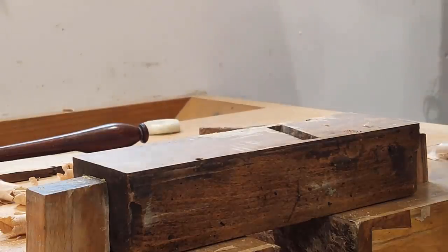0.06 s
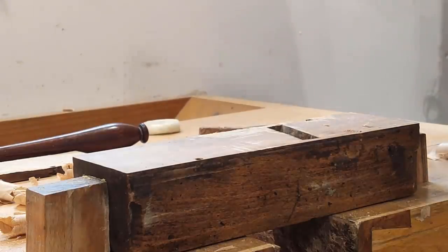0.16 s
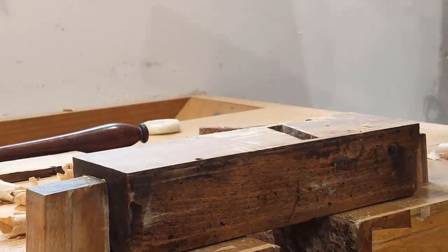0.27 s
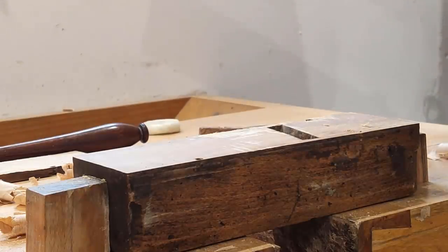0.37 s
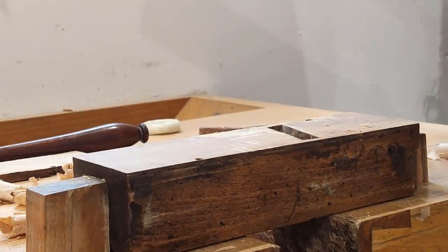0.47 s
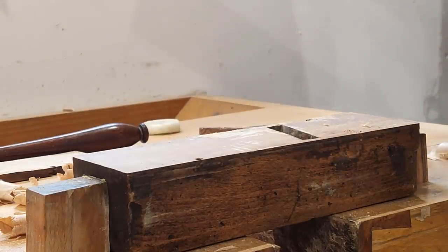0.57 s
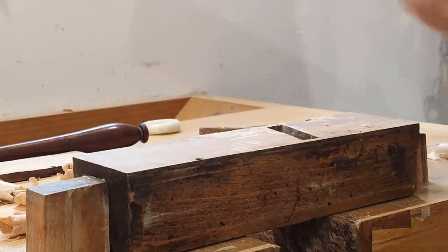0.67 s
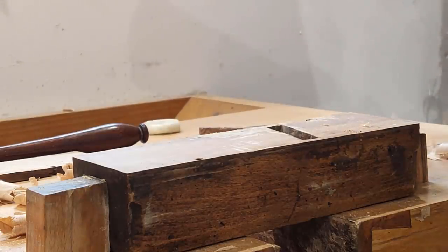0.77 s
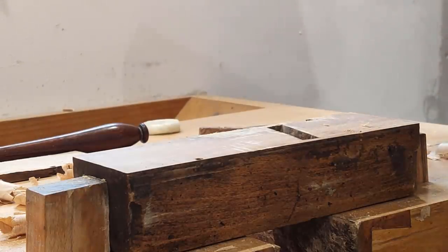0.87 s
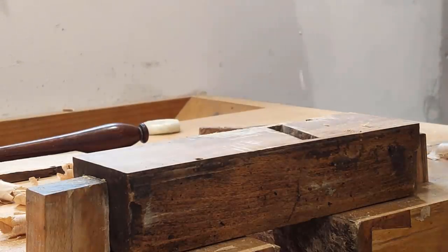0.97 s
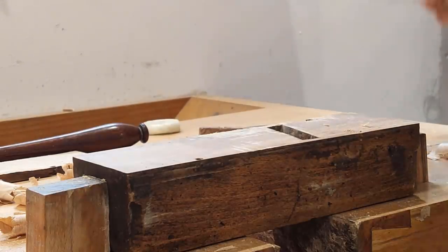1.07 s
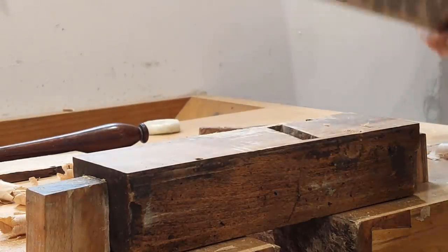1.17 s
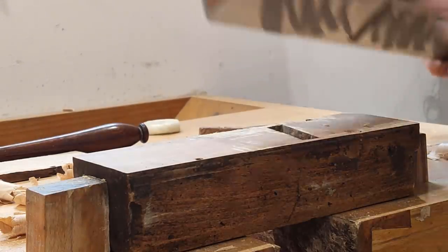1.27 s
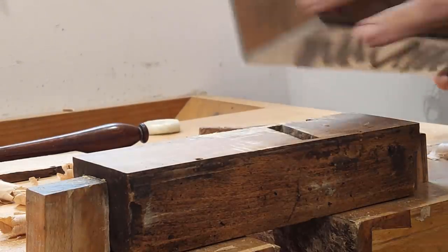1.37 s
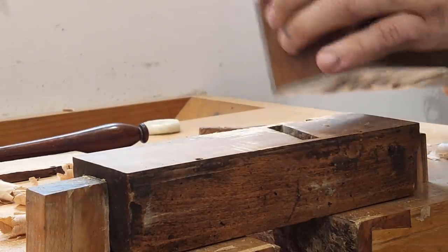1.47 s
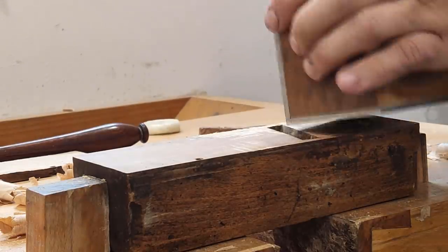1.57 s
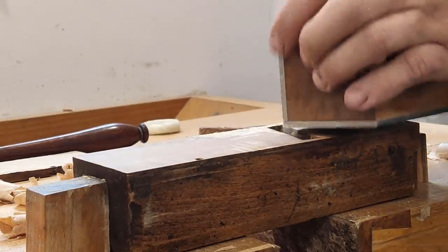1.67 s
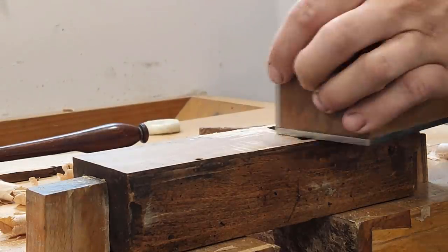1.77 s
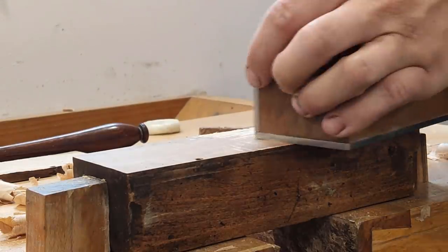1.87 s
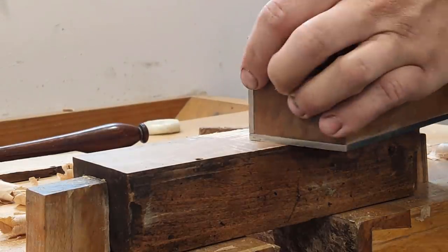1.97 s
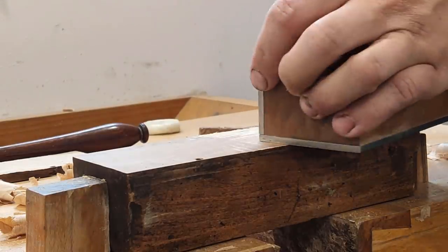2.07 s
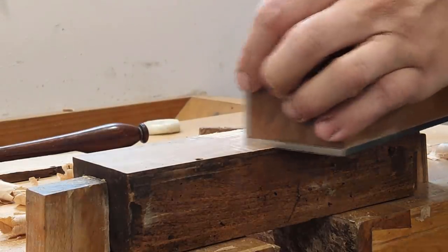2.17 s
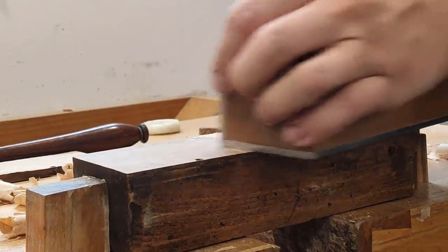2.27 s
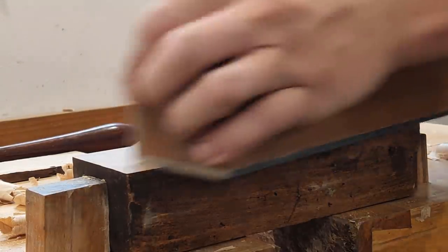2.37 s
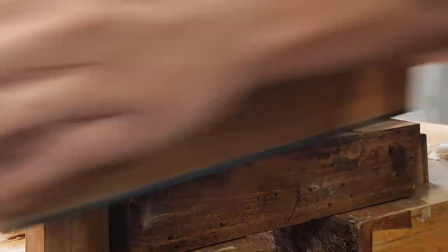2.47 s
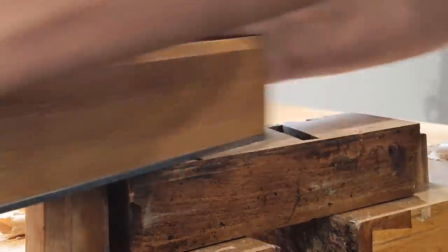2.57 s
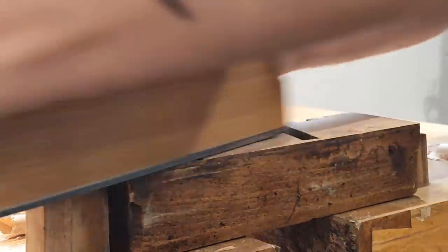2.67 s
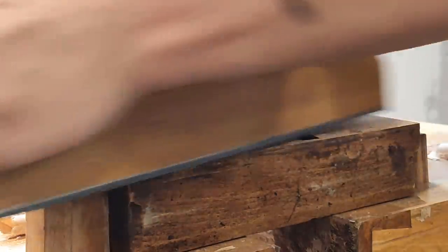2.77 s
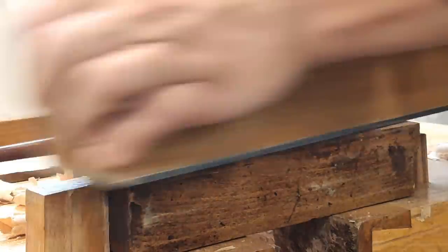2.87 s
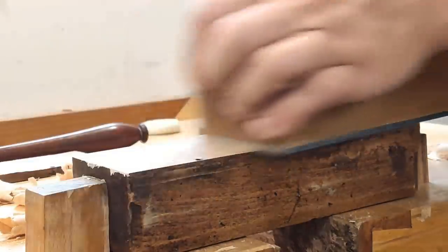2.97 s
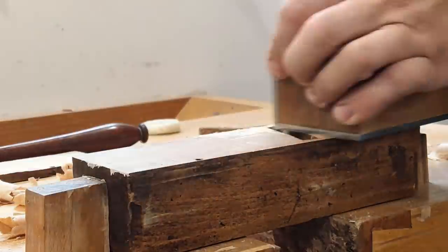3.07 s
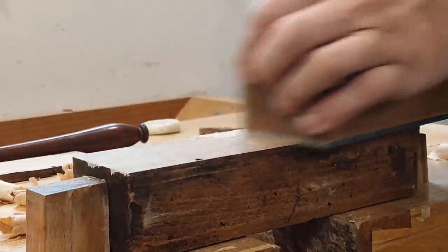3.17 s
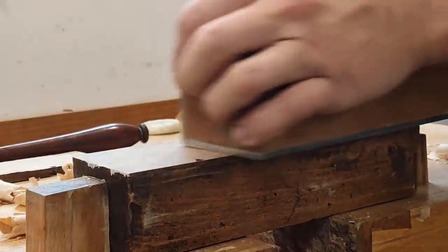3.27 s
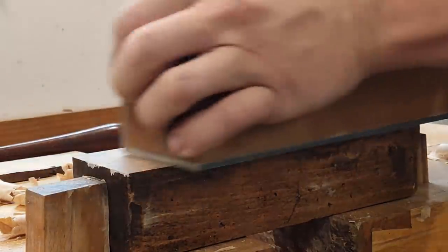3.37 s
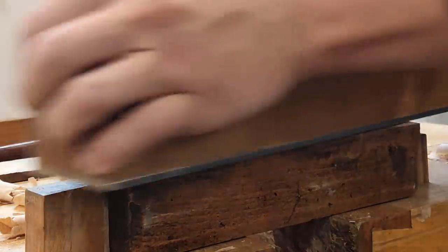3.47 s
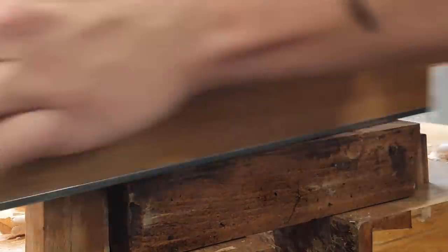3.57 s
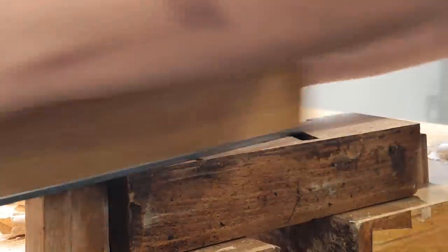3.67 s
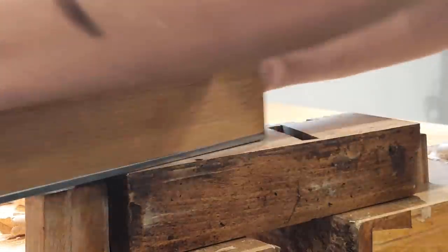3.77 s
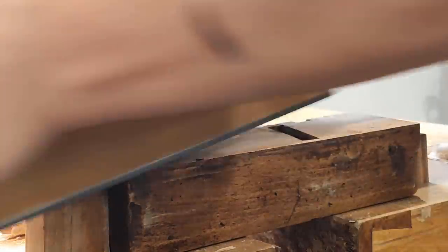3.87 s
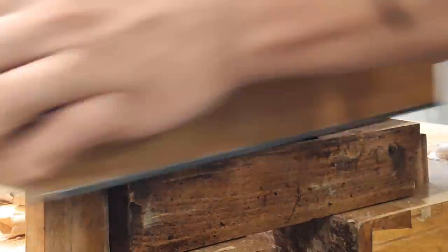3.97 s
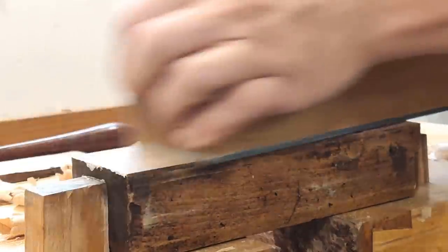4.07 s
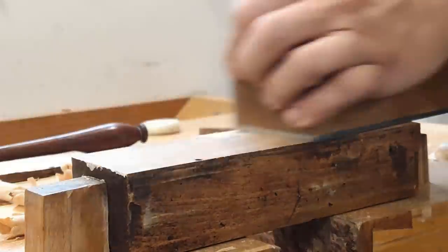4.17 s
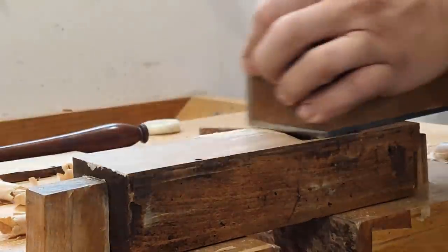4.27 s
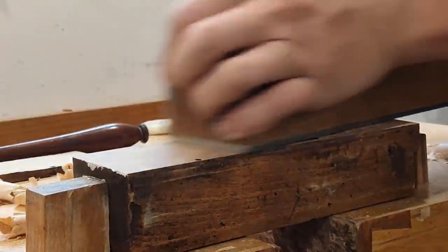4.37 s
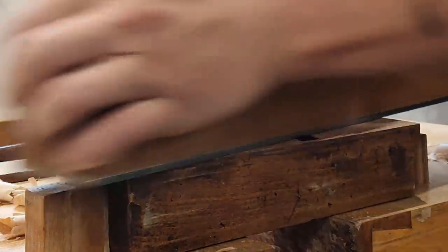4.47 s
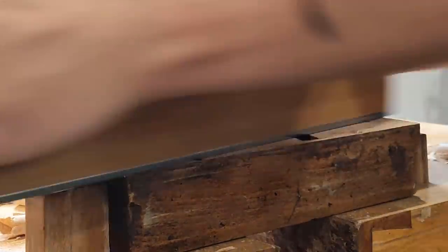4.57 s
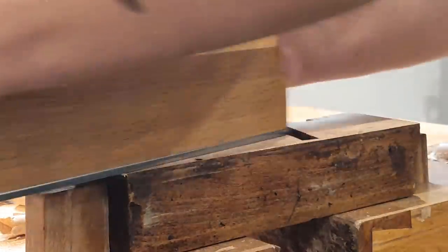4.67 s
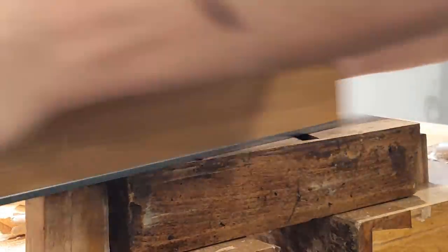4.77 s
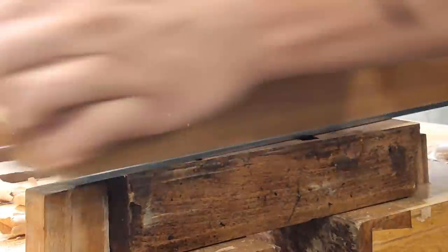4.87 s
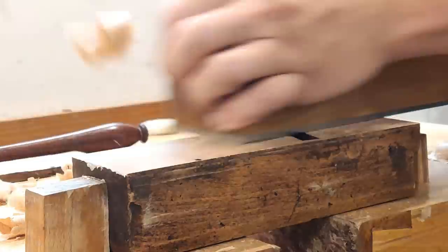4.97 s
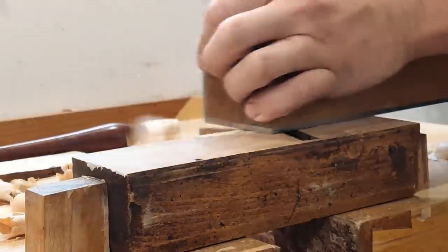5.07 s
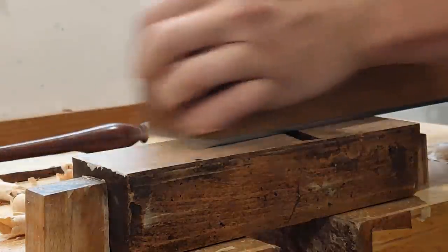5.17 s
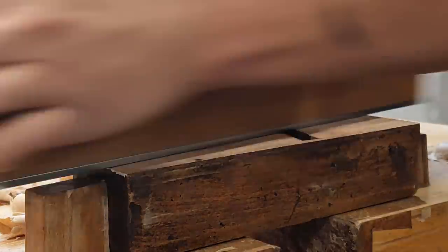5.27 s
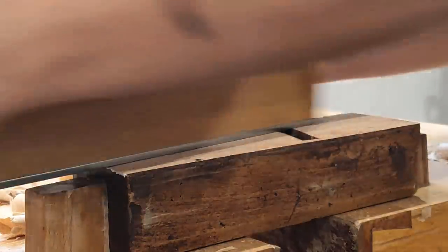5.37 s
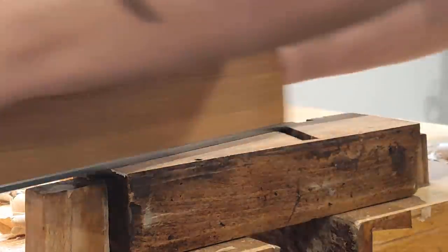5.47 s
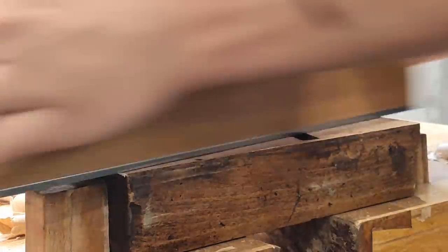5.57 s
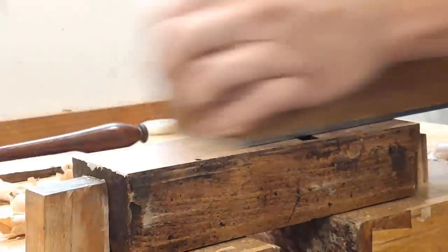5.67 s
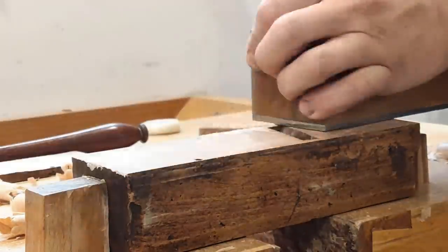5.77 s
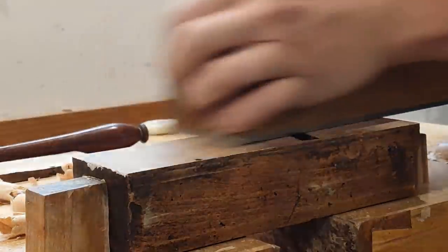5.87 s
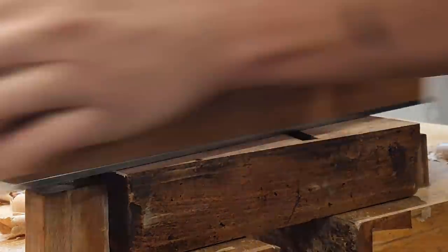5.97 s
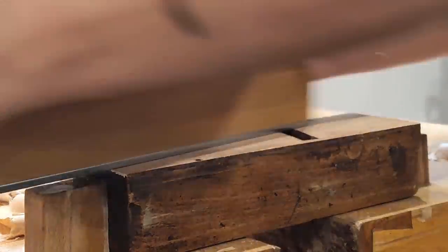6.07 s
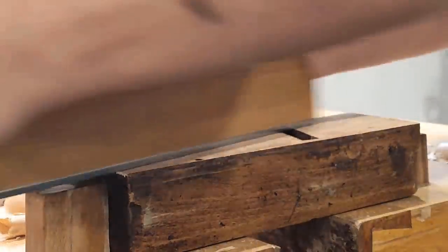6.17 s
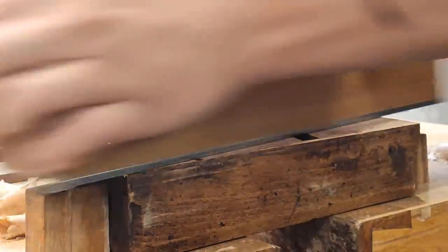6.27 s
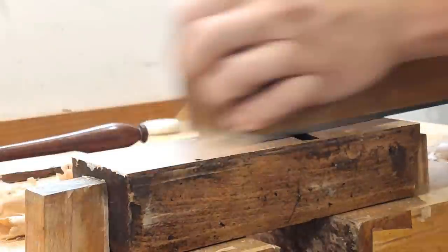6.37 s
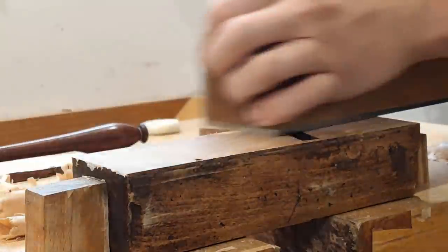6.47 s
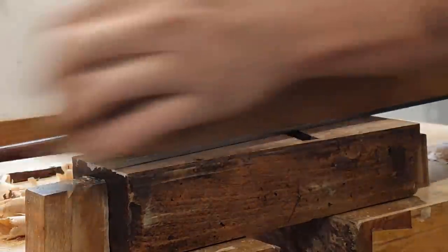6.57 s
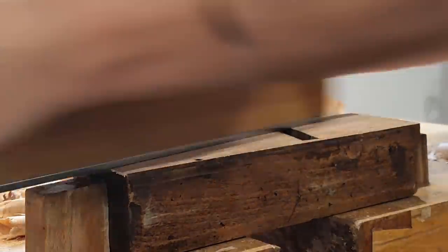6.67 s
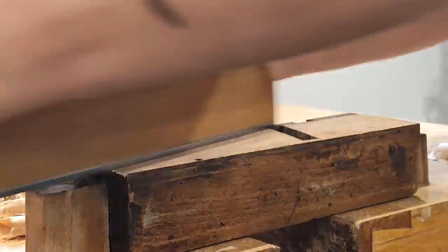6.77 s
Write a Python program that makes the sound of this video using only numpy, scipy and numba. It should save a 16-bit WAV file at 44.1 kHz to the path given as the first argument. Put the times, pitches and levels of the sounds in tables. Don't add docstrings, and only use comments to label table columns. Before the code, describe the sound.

A small hard-walled workshop, heard close in stereo, with soft air, faint hum and low bench sway. From 0 to 1.6 seconds only light sleeve and shaving rustles are heard, swelling near 0.6. At about 1.7 and 1.8 a hardwood board clacks onto a wooden block, then pauses. From 2.3 the first push tears over the steel edge, a bright fibrous hiss with a woody note and metallic ring, ending around 2.55. A knock at 2.9 and light drags lead to a longer push from 3.3 to 3.7. A rattling cluster of loud knocks comes at 4.0-4.25, with a squeak and a grab. Further pushes peak near 4.55, 5.35, 6.05 and 6.7, getting quicker, with duller scrapes back between. Dry chatters buzz at 5.0, loudest at 5.75 and doubled at 6.4; a thin squeal sounds near 5.4. The last push is cut off close to its end.

```python
import sys
import numpy as np
from scipy import signal
from scipy.fft import rfft, irfft, next_fast_len
from scipy.io import wavfile
from scipy.ndimage import uniform_filter1d
from numba import njit

SR = 44100
rng = np.random.default_rng(int(sys.argv[2]) if len(sys.argv) > 2 else 0)


def field_ratio(decibels):
    return 10 ** (np.asarray(decibels, dtype=float) / 20)


def bounce(signal):
    frames = np.transpose(np.atleast_2d(signal))
    limited = np.clip(frames, -1, 1)
    pcm = np.round(limited * 32767).astype(np.int16)
    wavfile.write(sys.argv[1], SR, pcm)


N = 300762
FAST = next_fast_len(N)
FREQS = np.fft.rfftfreq(FAST, 1 / SR) + 1e-3
TIME = np.arange(N) / SR

# t/s, blow level/dB, crack level/dB, bench bass/dB
KNOCKS = [(1.68, -16.5, -42, 13), (1.688, -12, -47, -1), (1.703, -12.5, -45, -0.5), (1.827, -5.5, -36, -4),
          (2.271, -39, -39.5, 13), (2.295, -22, -41, 4.5), (2.898, -15.5, -23.5, 10.5),
          (2.913, -4.5, -20.5, 6.5), (3.099, -17, -27.5, -1), (3.294, -49, -21.5, -11),
          (4.029, -12.5, -25, 7), (4.051, -5, -37, 1), (4.076, 1.5, -13, -4), (4.096, -2, -47, -22),
          (4.109, 0, -32, -11), (4.123, -3, -20.5, -5), (4.249, -12, -48, -27), (4.436, -14, -20.5, -4),
          (4.932, -25, -36, -3.5), (5.234, -31, -31.5, -7), (5.593, -35, -67, 20), (5.636, -31.5, -69, 7),
          (5.664, -38, -35, 13), (5.81, -10, -66, 2.5), (5.97, -37, -48, 6), (6.047, -21, -30.5, 2),
          (6.121, -15, -59, 5.5), (6.339, -29, -28.5, -10), (6.602, -41, -35, -9), (6.751, -16.5, -54, 6.5)]
# t/s, level/dB, f/Hz, build-up/ms, dust level/dB
CHATTERS = [
    (4.248, -19.5, 1500, 6.1, -25),
    (5.022, -12.5, 1606, 3.2, -7.5),
    (5.745, -4.5, 1393, 6, -3),
    (6.4233, -12, 1540, 4.3, 2),
    (6.4336, -9, 1500, 3.6, -24),
]
PUSH_CONTACTS_S = [2.275, 3.292, 4.435, 5.228, 5.967, 6.598]
PULL_CONTACTS_S = [2.9, 3.16, 4.075, 4.931, 5.0, 5.665, 6.34]
# full speed t/s, lift t/s, pressure level/dB, level at contact/dB
PUSHES = [
    (2.445, 2.549, -32.5, -63),
    (3.46, 3.732, -33, -62),
    (4.53, 4.638, -31, -49),
    (5.345, 5.422, -34, -40.5),
    (6.06, 6.086, -33.5, -29),
    (6.65, 6.72, -31, -30),
]
PULLS = [
    (2.97, 2.972, -36, -46.5),
    (3.22, 3.272, -44.5, -48.5),
    (4.184, 4.178, -36.5, -51),
    (4.932, 4.932, -37, -33.5),
    (5.017, 5.04, -32, -49),
    (5.75, 5.77, -31, -33.5),
    (6.363, 6.43, -31, -34.5),
]


def unit(x):
    return x / np.sqrt(np.mean(x ** 2))


def along(points, hz):
    f, v = np.transpose(points)
    return np.interp(np.log(hz), np.log(f), v)


def filtered(x, response):
    return irfft(rfft(x, FAST) * response, FAST)[..., :x.shape[-1]]


def coloured(x, points):
    return unit(filtered(x, field_ratio(along(points, FREQS))))


def ringing(x, peaks):
    response = 0
    for k, (hz, width_hz, db) in enumerate(peaks):
        damping = 1j * FREQS * width_hz
        response = response + (-1) ** k * field_ratio(db) * damping / (hz ** 2 - FREQS ** 2 + damping)
    return unit(filtered(x, response))


@njit
def moving_band(x, hz, sharp):
    y, b, l, k = np.empty(len(x)), 0., 0., 1 / sharp
    for i in range(len(x)):
        g = np.tan(np.pi * hz[i] / SR)
        v = (b + g * (x[i] - l)) / (1 + g * (g + k))
        b, l, y[i] = 2 * v - b, l + 2 * g * v, k * v
    return y


def walk(rate_hz):
    k = int(SR / rate_hz)
    steps = rng.standard_normal(N // 100)[:N // k + 1]
    return unit(uniform_filter1d(np.repeat(steps, k), k)[:N])


def fibres(spread_db, flicker_db, rate_hz, count):
    size_db = spread_db * np.minimum(rng.exponential(size=N), 8)
    sizes = field_ratio(size_db + flicker_db * walk(rate_hz))
    return rng.standard_normal((count, N)) * sizes


def add(track, s, sound):
    i = max(int(s * SR), 0)
    track[i:i + len(sound)] += sound[:N - i]


def bump(s, db, ms):
    return field_ratio(db) / np.cosh(np.clip((TIME - s) / ms * 1000, -50, 50))


def fading(s, db, db_per_s):
    return (TIME >= s) * field_ratio(db - db_per_s * np.abs(TIME - s))


def spread(mid, side):
    # f/Hz, side over mid/dB
    shop_width = [(60, -14), (200, -12), (400, -9.5), (800, 0.5), (2000, -1.5), (14000, 0)]
    side = filtered(side, field_ratio(along(shop_width, FREQS)))
    return np.array([mid + side, mid - side])


def rocking():
    # t/s, level/dB, spread/ms
    lurches = [(0.0, -42, 43), (1.82, -34, 26), (2.32, -31, 22), (2.54, -38, 81), (3.33, -38, 48),
               (3.65, -36.5, 110), (4.11, -26, 35), (4.54, -31, 58), (4.75, -38, 115), (5.43, -28.5, 60),
               (6.12, -30, 69), (6.7, -39, 63)]
    idle_db = -53
    return field_ratio(idle_db) + sum(bump(*row) for row in lurches)


def background():
    # f/Hz, level/dB per Hz
    air_spectrum = [(29, -34), (50, 0), (103, -4.5), (210, -3.5), (663, -18.5), (747, -17), (1150, -22.5),
                    (1950, -22), (4180, -28.5), (6280, -33.5), (8370, -44), (13500, -34), (15200, -61)]
    # f/Hz, level/dB
    hum_tones = [
        (199.2, -61.5),
        (242.2, -63.5),
    ]
    air_db = -55 + 0.2 * walk(2.9)
    air = spread(*coloured(rng.standard_normal((2, N)), air_spectrum)) * field_ratio(air_db)
    hum = 0
    for hz, db in hum_tones:
        hum = hum + field_ratio(db + 3.5 + 0.72 * walk(4.86)) * np.sin(2 * np.pi * hz * TIME)
    sway = spread(*ringing(rng.standard_normal((2, N)), [(21.8, 8.4, -4.5), (46.7, 7.8, -10.5)]))
    return air + hum + sway * rocking() * field_ratio(-3.0)


def rustle():
    # t/s, level/dB, rise/ms, fall/(dB/s), dull part/dB
    brushes = [(0.0, -56, 6.2, 138, 16), (.246, -55, 69, 349, 3), (.305, -50.5, 27, 173, 0),
               (.584, -47.5, 310, 80, -9), (0.684, -41.5, 80, 330, -0.5), (.93, -46.5, 54, 215, -8),
               (1.422, -40.5, 4.5, 237, -9), (1.64, -52.5, 5, 497, -10), (1.678, -44.5, 3, 504, -1),
               (1.704, -69, 15, 270, 29), (1.836, -70.5, 17, 140, 38), (2.142, -52, 32, 370, 0),
               (2.26, -63, 36, 300, 21)]
    # f/Hz, level/dB per Hz
    cloth = [(880, -104), (1500, -1.5), (2440, 1), (3070, -1), (6060, -2), (8510, -11), (13700, -9),
             (14700, -31), (15200, -74)]
    rise_db = 22
    brush = fibres(spread_db=2.5, flicker_db=1.2, rate_hz=70, count=1)[0]
    bright = coloured(brush, cloth)
    dull = ringing(brush, [(554, 300, 12.8), (1230, 740, 8)])
    bright_gain, dull_gain = 0, 0
    for s, db, rise_ms, fall_db_per_s, dull_db in brushes:
        rise = (s - TIME) * rise_db / rise_ms * 1000
        gain = field_ratio(db - np.where(TIME < s, rise, (TIME - s) * fall_db_per_s))
        bright_gain = bright_gain + gain
        dull_gain = dull_gain + gain * field_ratio(dull_db - 6.0)
    return bright_gain * bright + dull_gain * dull


def knocks():
    # f/Hz, level/dB, t60/s
    wood = [(110.4, -4.5, 0.2), (146.5, 3, 0.14), (212.7, -3, 0.15), (299.7, 1.5, 0.096),
            (350.2, -2.5, 0.1), (394.6, 5.5, 0.08), (484, 0, 0.077), (574, -11, 0.21), (662, -14, 0.14),
            (745, -5, 0.07), (820, -13.5, 0.13), (932, -14, 0.11), (1043, -7, 0.026), (1360, -8.5, 0.037),
            (1650, -68, 0.029)]
    soft_push_ms, hard_push_ms = 1, 0.55
    crack_s, tick_s, tick_db = .005, .0006, -0.5
    out, t = np.zeros(N), np.arange(SR // 4) / SR
    hz, mode_db, t60_s = (c[:, None] for c in np.transpose(wood))
    crack_band = signal.butter(2, [700, 3600], "band", fs=SR, output="sos")
    growth = 1 - np.exp(-t * hz / 2.5)
    for s, blow_db, crack_db, bass_db in KNOCKS:
        hardness = np.clip(1.5 + blow_db / 30, 0, 1)
        push_ms = soft_push_ms + (hard_push_ms - soft_push_ms) * hardness
        chance = rng.standard_normal((len(wood), 3))
        struck_db = mode_db + 2.2 * chance[:, :1] + bass_db * (hz < 250)
        swings = np.sin(2 * np.pi * hz * (1 + 0.029 * chance[:, 1:2]) * t)
        modes = np.sign(chance[:, 2:]) * field_ratio(struck_db - 60 * t / t60_s) * growth * swings
        push = np.hanning(int(push_ms * SR / 1000) + 3)
        thud = np.convolve(modes.sum(axis=0), push / push.sum())[:len(t)]
        crack = signal.sosfilt(crack_band, rng.standard_normal(len(t))) * np.exp(-t / crack_s)
        tick = uniform_filter1d(rng.standard_normal(len(t)), size=3) * np.exp(-t / tick_s)
        add(out, s, field_ratio(blow_db - 10.5) * thud + field_ratio(crack_db + 7.0) * crack)
        add(out, s, field_ratio(crack_db + tick_db) * tick)
    return out


def chatters():
    out, t = np.zeros(N), np.arange(int(.03 * SR)) / SR
    dust_band = signal.butter(2, [4600, 7400], "band", fs=SR, output="sos")
    for s, db, hz, rise_ms, dust_db in CHATTERS:
        rise_s = rise_ms / 1000
        shape = np.where(t < rise_s, (t / rise_s) ** 1.8, np.exp(-(t - rise_s) / .0015))
        spit = signal.sosfilt(dust_band, rng.standard_normal(len(t)))
        spit = field_ratio(dust_db) * shape ** 2 * spit * 2
        add(out, s - .002, field_ratio(db + 2.0) * shape * (np.sin(2 * np.pi * hz * t) + spit))
    return out


def squeaks():
    # t/s, level/dB, f/Hz, length/ms
    squeals = [
        (4.215, -27, 2450, 14),
        (5.388, -24, 4600, 28),
        (5.398, -26, 4400, 24),
        (5.392, -25, 1820, 30),
        (5.3, -30, 2600, 25),
        (5.68, -31, 3570, 30),
        (5.72, -27, 2120, 14),
        (.1, -41, 152, 150),
        (4.17, -28, 1800, 30),
    ]
    out = np.zeros(N)
    for s, db, hz, length_ms in squeals:
        swell = np.hanning(int(length_ms * SR / 1000))
        wobble = 1 + .25 * uniform_filter1d(rng.standard_normal(len(swell)), 120)
        tone = np.sin(2 * np.pi * hz * np.cumsum(wobble) / SR)
        add(out, s - length_ms / 2000, field_ratio(db) * swell * tone)
    return out


def follow(contacts, rows, over_db, steep, late_db, fall_db_per_s):
    crumbs_db, crumbs_db_per_s = -16.5, 26
    out = 0
    for contact, (full, lift, db, first_db) in zip(contacts, rows):
        top = db + over_db
        swell_db = [top + steep * (first_db - db), top, top + late_db]
        swell = np.interp(TIME, [contact, full, lift], swell_db)
        out = out + (TIME >= contact) * (TIME < lift) * field_ratio(swell)
        out = out + fading(lift, top + late_db, fall_db_per_s)
        out = out + fading(lift, top + crumbs_db, crumbs_db_per_s)
    return out


def effort(k):
    # over pressure/dB, steepness, full speed to lift/dB, fall/(dB/s)
    on_push = [
        (0.2, 0.99, -3, 243),
        (-7.5, 0.71, -2, 239),
        (0, 0.83, -11, 198),
        (-2.2, 0.83, -9.5, 166),
    ]
    on_pull = [
        (1.1, 3, 0.1, 178),
        (-4.5, 3.2, 0.63, 340),
        (1, 1.4, 0.1, 106),
        (-2.5, 1.6, 0.1, 62),
    ]
    # over the cause/dB, fall/(dB/s)
    on_knock = [
        (-12, 305),
        (-54.5, 314),
        (-6, 333),
        (-12, 117),
    ]
    on_chatter = [
        (-35, 630),
        (-21.5, 900),
        (-9.5, 330),
        (-19, 470),
    ]
    # t/s, level/dB, spread/ms, shavings/dB, tug on board/dB
    bites = [(2.549, -33.5, 34.6, -5.5, -3.5), (2.71, -53.5, 15, 2, 8.5), (2.775, -48, 9, -30, -2),
             (3.31, -43, 27, -4, -4), (3.4, -61, 50, -13, 20.5), (3.64, -47.5, 18, 20, 5),
             (3.698, -35, 13.7, 2, 3), (4.032, -26, 3.1, -11, 8), (4.49, -51, 19, 5, 21),
             (4.596, -32.5, 38, 4, -0.5), (4.85, -49, 3.3, -12, -25), (4.89, -47, 2.7, -21, -15),
             (5.3, -56, 13, -6, 23), (5.387, -24.5, 27, -4, -9.5), (5.634, -41, 1.9, -12, -16),
             (5.655, -71, 3, -12, -8), (6.001, -45, 16, 11, 7), (6.088, -26, 31.6, -12, -17),
             (6.46, -54, 13, 6, 13.5), (6.718, -25.5, 30.5, -23, -7)]
    gain = follow(PUSH_CONTACTS_S, PUSHES, *on_push[k]) + follow(PULL_CONTACTS_S, PULLS, *on_pull[k])
    over_db, fall_db_per_s = on_knock[k]
    for s, _, crack_db, _ in KNOCKS:
        gain = gain + fading(s, crack_db + over_db, fall_db_per_s)
    over_db, fall_db_per_s = on_chatter[k]
    for s, db, _, rise_ms, _ in CHATTERS:
        gain = gain + fading(s + rise_ms / 1000, db + over_db, fall_db_per_s)
    for s, db, ms, tear_db, tug_db in bites:
        gain = gain + bump(s, db + (tear_db, 0, -9.5, tug_db)[k], ms)
    return 20 * np.log10(uniform_filter1d(gain, size=60) + 1e-6)


def gap_width():
    peak_hz = [
        3350,
        2750,
        3700,
        4370,
        3960,
        3540,
    ]
    push_share = (1, 1, 0.91)
    pull_hz = 2110
    points = []
    for contact, (full, lift, _, _), hz in zip(PUSH_CONTACTS_S, PUSHES, peak_hz):
        points.append((contact - .005, pull_hz))
        points += [(s, hz * share) for s, share in zip((contact, full, lift), push_share)]
        points.append((lift + .2, hz * push_share[2]))
    for contact, (_, lift, _, _) in zip(PULL_CONTACTS_S, PULLS):
        points += [(contact, pull_hz), (lift, pull_hz)]
    return np.interp(TIME, *np.transpose(sorted(points)))


def singing(slips, gap_hz, mean_gap_hz, drag_db, slack):
    on_push = (-5.5, 0.24, -1.5, 157)
    start_hz, sag_hz_per_s, sharp = 915.3, 24.1, 6.1
    pushing = uniform_filter1d(follow(PUSH_CONTACTS_S, PUSHES, *on_push), size=300)
    worked_s = TIME - PUSH_CONTACTS_S[0]
    note_hz = (start_hz - sag_hz_per_s * worked_s) * (1 + 0.29 * (gap_hz / mean_gap_hz - 1))
    halves = [moving_band(moving_band(half, note_hz, sharp), note_hz, sharp) for half in slips]
    note = unit(np.array(halves)) * field_ratio(2.5 - 0.28 * worked_s)
    return note * (pushing + field_ratio(drag_db - 11.0 - 8 * slack))


def strokes():
    # f/Hz, level/dB per Hz
    shaving_spectrum = [(1120, -23.5), (1900, 3.5), (2580, 3.5), (3360, -0.5), (4550, 2.5), (5050, -0.5),
                        (6500, -2.5), (7500, -15), (9750, -84), (16500, -120)]
    dust_spectrum = [(3820, -3), (6500, -9.5), (10400, -7.5), (12300, -11.5), (13800, -13), (14600, -47),
                     (15200, -89)]
    # f/Hz, width/Hz, level/dB
    steel_modes = [(1310, 140, -1.5), (1500, 70, 3), (1576, 61, 4.5), (1740, 260, -2), (1774, 260, -5.5),
                   (2145, 870, -12.5)]
    drag_modes = [(98, 24, -6), (130, 13.8, 3.5), (199.8, 27, -3.5), (337, 52, -5), (423.5, 43, -3),
                  (510, 50, -8), (657, 180, -12), (1243, 69, -10.5)]
    pull_bass_db = -16
    hiss_db, dust_db, ring_db, drag_db = (effort(k) for k in range(4))
    tear = fibres(spread_db=2.4, flicker_db=2.2, rate_hz=30, count=2)
    shaving = coloured(tear, shaving_spectrum)
    mean_gap_hz = gap_width()
    gap_hz = np.clip(mean_gap_hz * (1 + .1 * walk(16)), 1500., 6000.)
    gap = unit(np.array([moving_band(half, gap_hz, 3.5) for half in shaving]))
    gap = gap * field_ratio(-1.5 + 3 * walk(14))
    slips = fibres(spread_db=3.5, flicker_db=2.5, rate_hz=55, count=2)
    slack = np.clip((2400 - gap_hz) / 300, 0, 1)
    bass = ringing(slips, drag_modes[:2]) * field_ratio(-1.5 + pull_bass_db * slack)
    drag = ringing(slips, drag_modes[2:]) + bass
    out = singing(slips, gap_hz, mean_gap_hz, drag_db, slack)
    out = out + unit(shaving + gap) * field_ratio(hiss_db)
    out = out + coloured(tear, dust_spectrum) * field_ratio(dust_db)
    out = out + ringing(slips, steel_modes) * field_ratio(ring_db - 2.0)
    return out + drag * field_ratio(drag_db - 0.73)


def workshop(wet_db, onset_ms, early_db, early_ms, lag_ms):
    # f/Hz, t60/s
    shop_t60 = [(60, 0.68), (250, 0.42), (1000, 0.31), (4000, 0.33), (12000, 0.42)]
    t = np.arange(SR // 2) / SR
    tail = np.zeros((2, len(t)))
    for hz in 40 * 2. ** np.arange(0, 9):
        band = signal.butter(2, [hz, min(hz * 2, .49 * SR)], "band", fs=SR, output="sos")
        decay = field_ratio(-60 * t / along(shop_t60, hz))
        tail += signal.sosfilt(band, rng.standard_normal(tail.shape)) * decay
    ears = field_ratio(wet_db) * unit(spread(*(tail * (1 - np.exp(-t / onset_ms * 1000)))))
    ears += field_ratio(early_db) * unit(spread(*(tail * np.exp(-t / early_ms * 1000))))
    ears /= np.sqrt(len(t))
    lag = np.array([[1], [-1]]) * lag_ms * SR / 2000
    ears[:, :64] += np.sinc(np.arange(64) - 32 + lag) * np.hanning(64)
    return ears / np.sqrt(np.sum(ears ** 2) / 2)


def scene():
    direct_db = -12
    blows = knocks() + chatters() + squeaks() + rustle()
    place = 2 * np.pi * 1.3 * TIME + walk(2)
    out = background() + field_ratio(direct_db) * blows
    for half, share, lag_ms in zip(strokes(), (np.cos(place), np.sin(place)), (.16, -.12)):
        ears = workshop(wet_db=-1.5, onset_ms=5.8, early_db=-2.5, early_ms=5.0, lag_ms=lag_ms)
        bench = np.abs(share) * blows + half / np.sqrt(2)
        out = out + signal.fftconvolve(bench[None], ears, axes=1)[:, 32:N + 32]
    return out


def band_limit(x):
    return signal.sosfilt(signal.butter(12, 15380, fs=SR, output="sos"), x)


def record(dry):
    top = signal.ellip(8, .2, 60, 14700, fs=SR, output="sos")
    rounded = .9 * np.tanh(dry / .9)
    mix = signal.sosfilt(top, rounded) * field_ratio([[-.25], [.25]])
    return band_limit(mix)


dry = scene()
out = record(dry)
bounce(out)
```